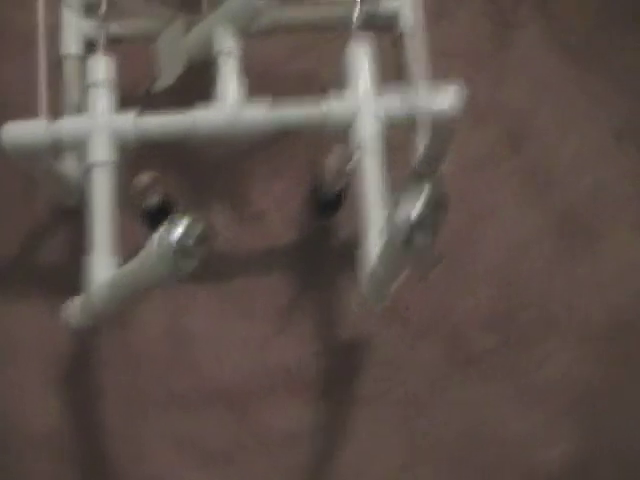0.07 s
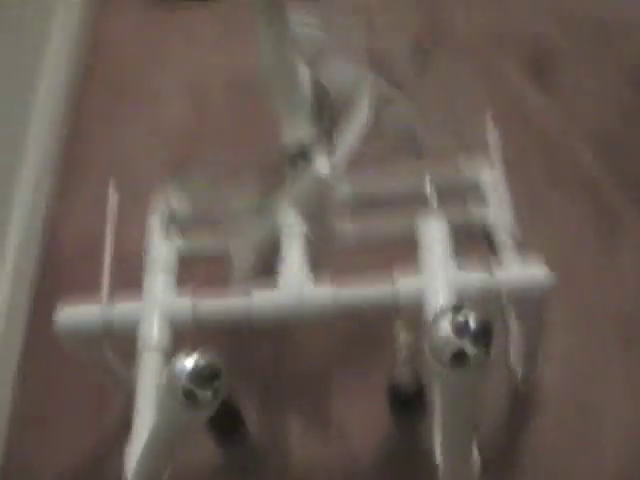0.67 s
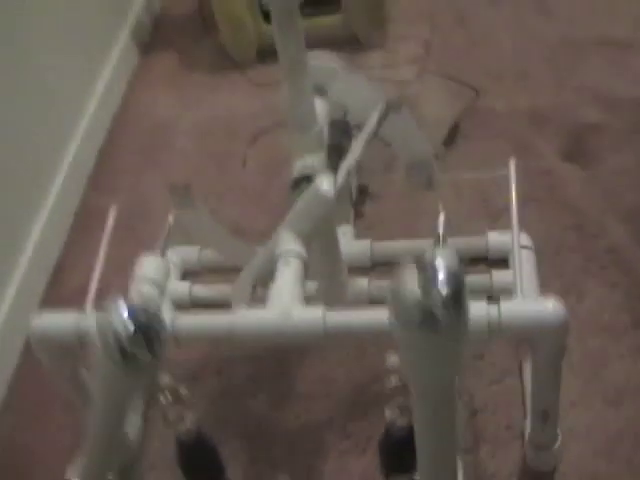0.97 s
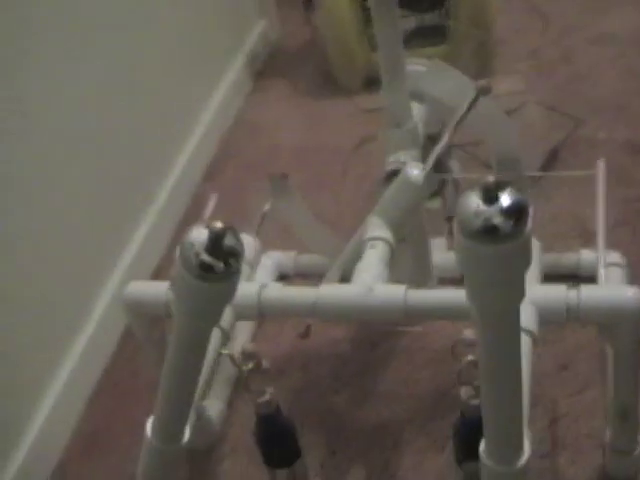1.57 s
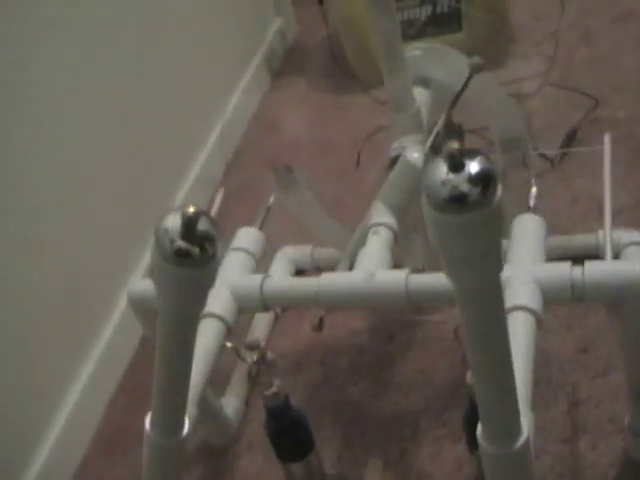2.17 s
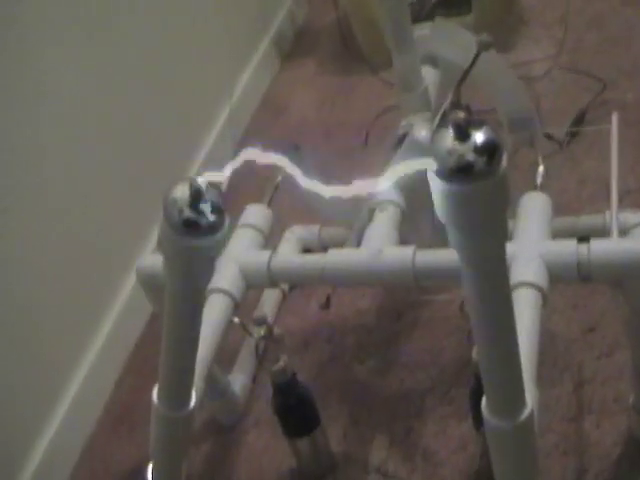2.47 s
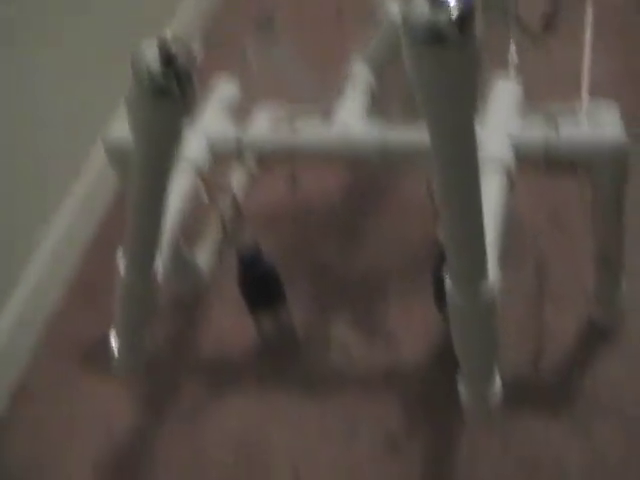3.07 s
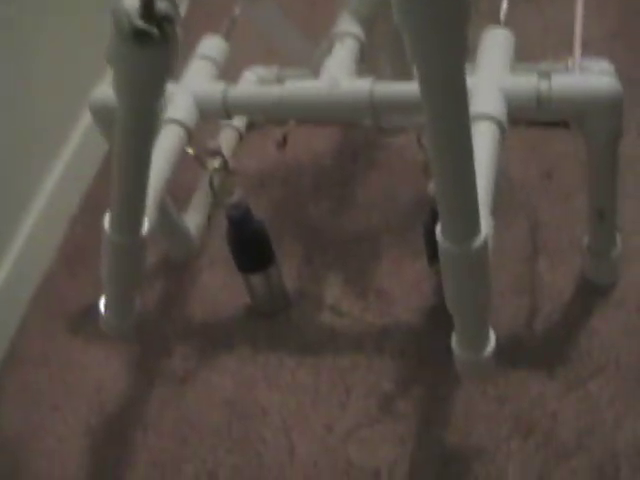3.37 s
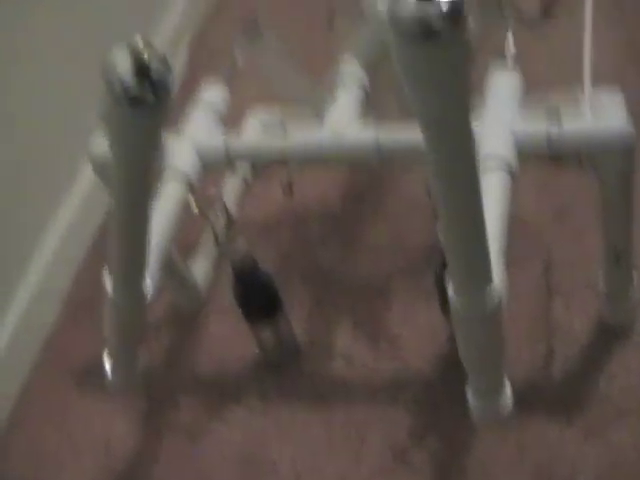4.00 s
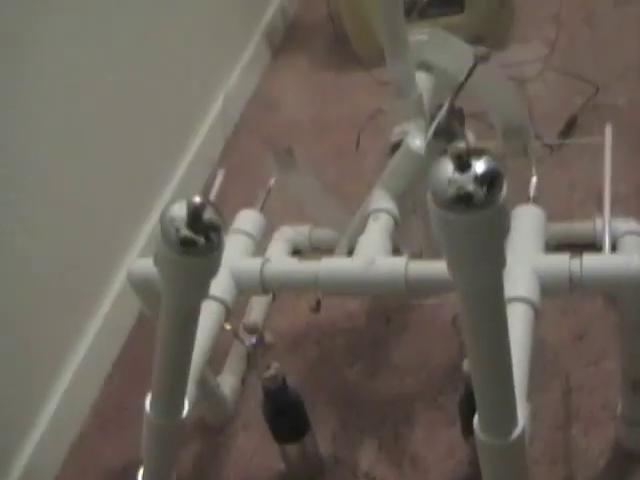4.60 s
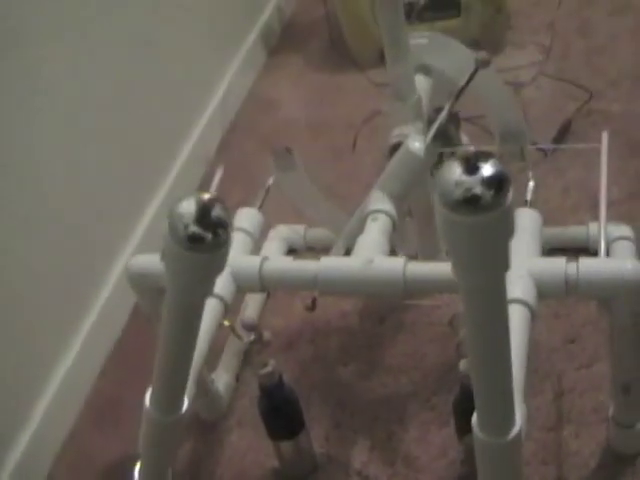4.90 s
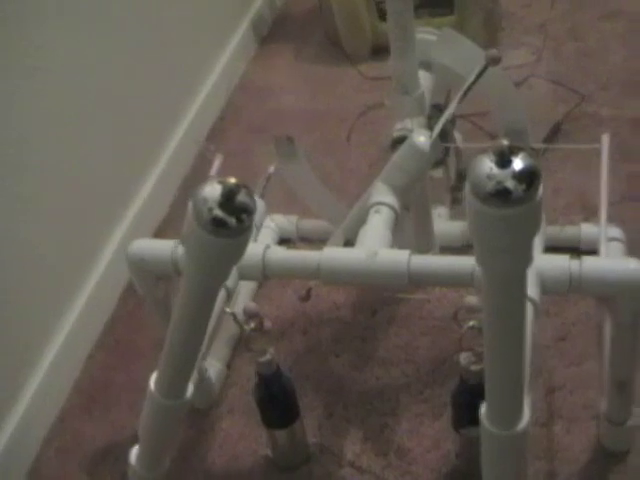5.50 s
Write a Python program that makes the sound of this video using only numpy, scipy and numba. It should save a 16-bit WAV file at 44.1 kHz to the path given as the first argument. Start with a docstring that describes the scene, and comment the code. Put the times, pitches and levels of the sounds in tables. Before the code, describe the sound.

An electrostatic generator runs in a small carpeted room with a faint throbbing hum, a thin motor whine and a light brush squeak. An electric hiss grows and tiny ticks crowd together until a loud, sharp spark snaps between metal terminals. Four sparks come a little over a second apart. After each, the machine sound ducks and swells back. The microphone is close, drifting slightly nearer and then away.

```python
"""An electrostatic generator runs in a small carpeted room; the sound opens ducked by a spark just gone.
The gain recovers: the rotor throbs, its brush squeaks and the motor whines. As charge builds, corona
hisses louder and ticks ever faster, until a spark jumps the gap at about 1.3 s. The snap overloads the
amplifier, the gain control ducks, and the machine swells back. Three more sparks follow, a little over
a second apart, while the microphone drifts closer and, after about 3.3 s, away again."""
import sys
import numpy as np
from scipy import signal
from scipy.fft import rfft, irfft, next_fast_len
from scipy.io import wavfile
from numba import njit

SR = 44100
rng = np.random.default_rng(int(sys.argv[2]) if len(sys.argv) > 2 else 0)


def to_wav(s):
    """Save 16-bit WAV."""
    ch = np.atleast_2d(s).T  # columns
    pcm = np.round(np.clip(ch, -1, 1) * 32767)  # PCM
    wavfile.write(sys.argv[1], SR, pcm.astype(np.int16))


N = 249165
TIME = np.arange(N) / SR

# Breakdowns of the gap: t/s, level/dB, signed kick induced in the left lead, in the right lead
SPARKS = [(-0.062, 5, -6.5, -1), (1.2648, 10.5, -36, -8.5), (2.5443, 12, 28, -39),
          (3.9418, 10.5, -33, 11.5), (5.1486, 8, -5, 1)]
# The clearest small discharges before breakdown: t/s, level/dB
TICKS = [(1.0950, -9), (1.1416, -2.5), (2.4185, -9.5), (3.464, -3), (3.7300, -4), (3.8235, -6),
         (3.861, -4.5), (3.8801, -5), (4.8716, -10.5)]
# Spectrum of a discharge: f/Hz, level/dB
DISCHARGE_SPECTRUM = [(30, 16.5), (150, 4.5), (500, -4.5), (1200, -2.5), (2200, 0), (5000, -1), (8000, 1.5),
                      (11000, 3), (13000, -0.5), (15500, -6)]
# Spectrum of the corona hiss: f/Hz, level/dB
CORONA_SPECTRUM = [(25, -28), (60, -12), (130, -1), (250, -1.5), (400, -2.5), (1000, -2), (2000, -1),
                   (5000, 0.5), (7800, -1), (10100, 2), (11400, 0), (12400, -0.5), (13400, -3), (15500, -8)]
# Harmonics of the rotor hum: multiple of the turning rate, level/dB
ROTOR_HARMONICS = [(3, -67), (6, -53), (8, -57), (9, -68), (10, -55), (11, -42), (12, -41), (13, -89),
                   (14, -51.5), (18, -61), (19, -69), (26, -58.5), (27, -56.5), (28, -57.5), (39, -55.5)]
# Bouts of louder brush squeak: t/s, half length/s, rise/dB
SQUEAK_BOUTS = [(0.25, 0.45, 11), (2.85, 0.2, 2)]
# Harmonics of the motor: multiple of the shaft rate, level/dB
MOTOR_HARMONICS = [(1, -66), (3, -55), (4, -53), (5, -48), (6, -44), (10, -50), (15, -50.5), (20, -62),
                   (25, -55), (30, -52), (31, -61), (35, -73), (36, -69)]
# Standing-wave maxima on the microphone's path: t/s, half length/s, multiple of the shaft rate, rise/dB
ANTINODES = [(0.48, 0.11, 15, 8), (2.92, 0.32, 30, 7.5)]
# Reverberation time of the room: f/Hz, T60/s
REVERB_TIMES = [(100, 0.083), (600, 0.15), (2000, 0.21), (5000, 0.23), (9000, 0.2), (15000, .14)]
# Stereo width at the microphone pair: f/Hz, side level relative to mid/dB
STEREO_WIDTH = [(60, -9), (200, -5.5), (1300, -15.5), (2500, -29), (4400, -7), (8000, -7), (15000, -3.5)]


def sparks(kick_s=.00072, swing_s=.0031, drive=7):
    """Breakdown and induction: each spark snaps, and its current induces a kick in the microphone leads."""
    t = np.arange(2 ** 14) / SR
    backswing = kick_s / swing_s * np.exp(-t / swing_s)
    kick = np.tanh(drive * (np.exp(-t / kick_s) - backswing))
    out = np.zeros((2, N))
    for s, db, left, right in SPARKS:
        # so short a spark radiates hardly any bass: the thump is all electrical
        crack = band(snap(t), 220, 19000)
        add(out, s, undb(db) * crack + np.outer([left, right], kick))
    return out


def snap(t, direct_db=10, direct_s=0.0078, uneven_db=3.5, side_db=-5):
    """Reverberation: a shock wave is followed by dense echoes that decay exponentially in each band."""
    mid, side = rng.standard_normal((2, len(t))) * undb(uneven_db * rng.standard_normal(len(t)))
    echoes = unit(colour(mid + undb(side_db) * side * np.array([[1], [-1]]), DISCHARGE_SPECTRUM))
    spectrum, hz = rfft(echoes), np.fft.rfftfreq(len(t), 1 / SR)
    out = undb(direct_db) * echoes * np.exp(-t / direct_s)
    for centre, t60 in REVERB_TIMES:
        share = lookup([(f, float(f == centre)) for f, _ in REVERB_TIMES], hz)
        out = out + irfft(spectrum * share, len(t)) * np.exp(-np.log(1000) * t / t60)
    return out


def ticks(body=0.77, right_db=-2.0, room_db=-27, room_s=0.0068):
    """Partial discharge: each tiny pulse radiates a bright click, trailed by a short wash of echoes."""
    t = np.arange(2 ** 12) / SR
    pulse = signal.unit_impulse(len(t))
    click = band(pulse, 7300, 11300) + body * band(pulse, 1500, 11700)
    click = click / np.abs(click).max() * undb([[0], [right_db]])
    out = np.zeros((2, N))
    for s, db in TICKS + crackle():
        noise = stereo(*rng.standard_normal((2, len(t))))
        wash = unit(colour(noise, DISCHARGE_SPECTRUM)) * np.exp(-t / room_s)
        add(out, s, undb(db) * (click + undb(room_db) * wash))
    return out


def crackle(rate_per_s=30, reached_s=1.33, e_fold_s=0.09, level_db=-10, spread_db=1.8):
    """A Poisson process: faint ticks crowd together as breakdown nears. Rows of t/s, level/dB."""
    per_s = rate_per_s * np.exp((charging_time() - reached_s) / e_fold_s)
    times = TIME[rng.random(N) < per_s / SR]
    return [(s, level_db + spread_db * rng.standard_normal()) for s in times]


def corona(level_db=-26.25, growth_db_per_s=1.7, reached_s=2.0, flicker_db=0.95):
    """Corona discharge: charge leaks off the metal as a hiss that grows until the next spark."""
    noise = stereo(*rng.standard_normal((2, N)))
    hiss = unit(reflections(colour(noise, CORONA_SPECTRUM)))
    return hiss * undb(level_db + growth_db_per_s * (charging_time() - reached_s) + flicker_db * walk(40))


def rotor(gain_db, turns, load_db_per_s=1.2, flutter_db=1.1):
    """Beating: adjacent harmonics throb once a turn; the hum grows as charge loads the rotor."""
    level_db = gain_db + load_db_per_s * charging_time() + flutter_db * walk(14)
    return undb(level_db) * harmonics(turns, ROTOR_HARMONICS)


def motor(low_db, high_db, shaft_hz=122.45, flutter_db=2.0):
    """Shaft harmonics: a small motor drones on its low orders and whines chiefly on every fifth."""
    turns = rotation(shaft_hz, wander=0.00204, wander_per_s=7)
    out = np.zeros(N)
    for order, db in MOTOR_HARMONICS:
        gain_db = low_db if order < 10 else high_db
        level_db = gain_db + standing_wave_db(order) + flutter_db * walk(7)
        out += undb(level_db) * harmonics(turns, [(order, db)])
    return out


def brush(gain_db, turns, level_db=-46, fade_db_per_s=2, lag_turns=0.11):
    """Sliding friction: the brush squeaks just after each throb, and fades while the charge builds."""
    contact = (.5 + .5 * np.cos(2 * np.pi * (turns - lag_turns))) ** 3
    squeak = unit(contact * band(rng.standard_normal(N), 3530, 3830))
    bouts_db = sum(db * bell(s, half_s) for s, half_s, db in SQUEAK_BOUTS)
    return undb(gain_db + level_db + bouts_db - fade_db_per_s * charging_time()) * squeak


def reflections(x, share=0.1, first_s=0.000811, last_s=.008, drift_s=.00004, count=5):
    """Interference: echoes off frame, floor and wall ripple the spectrum, shifting as the microphone moves."""
    out = x
    for lag_s in np.geomspace(first_s, last_s, count) * rng.uniform(.9, 1.099, count):
        emitted_s = TIME - lag_s - drift_s * walk(1.0)
        out = out + share * np.array([np.interp(emitted_s, TIME, channel) for channel in x])
    return out


def standing_wave_db(order):
    """Standing waves: a motor harmonic swells as the microphone passes through its antinode."""
    return sum(db * bell(s, half_s) for s, half_s, k, db in ANTINODES if k == order)


def spreading_db(closest_m=0.64, closest_at_s=3.28, speed_m_per_s=0.26):
    """Spherical spreading: direct pressure falls as 1/distance, from 0 dB at the closest approach."""
    distance_m = np.hypot(closest_m, speed_m_per_s * (TIME - closest_at_s))
    return 20 * np.log10(closest_m / distance_m)


def charging_time():
    """Charge accumulation: seconds since the last spark."""
    times = np.array(SPARKS)[:, 0]
    return TIME - times[np.searchsorted(times, TIME) - 1]


def rotation(hz, wander, wander_per_s):
    """Phase as the integral of frequency: turns made by a slightly unsteady shaft."""
    return np.cumsum(hz * (1 + wander * walk(wander_per_s))) / SR


def harmonics(turns, orders):
    """A Fourier series locked to a turning shaft."""
    return sum(np.sqrt(2) * undb(db) * np.cos(2 * np.pi * k * turns) for k, db in orders)


def stereo(mid, side):
    """Sum and difference: left and right share the mid signal and differ by the filtered side signal."""
    return mid + colour(side, STEREO_WIDTH) * np.array([[1], [-1]])


def colour(x, points):
    """Spectral shaping by a curve of f/Hz, level/dB."""
    size = next_fast_len(x.shape[-1])
    gain = undb(lookup(points, np.fft.rfftfreq(size, 1 / SR)))
    return irfft(rfft(x, size) * gain, size)[..., :x.shape[-1]]


def lookup(points, hz):
    """Interpolation of f/Hz, value points on a log-frequency axis."""
    f, value = np.transpose(points)
    return np.interp(np.log(hz + 1), np.log(f), value)


def band(x, lo_hz, hi_hz):
    """Band-pass filtering."""
    return signal.sosfilt(signal.butter(2, [lo_hz, hi_hz], "band", fs=SR, output="sos"), x)


def walk(per_s):
    """Random modulation with a spread near 1, interpolated between per_s new values a second."""
    knots = rng.standard_normal(int(6 * per_s) + 2)
    return np.interp(TIME * per_s, np.arange(len(knots)), knots)


def bell(s, half_s):
    """A Gaussian swell of height 1 around time s."""
    return np.exp(-((TIME - s) / half_s) ** 2)


def undb(db):
    """Amplitude ratio of a level in decibels."""
    return np.exp(np.asarray(db) * (np.log(10) / 20))


def unit(x):
    """Normalisation to rms 1."""
    return x / np.sqrt(np.mean(x ** 2))


def add(out, s, sound):
    """Superposition of a sound starting at time s."""
    start = int(round(s * SR))
    a, b = max(start, 0), min(start + sound.shape[-1], N)
    out[:, a:b] += sound[..., a - start:b - start]


def scene(rotor_hz=20.2, rotor_db=-0.6, drone_db=-0.1, whine_db=-0.3, corona_direct=0.58):
    """Superposition: the discharges and the running machine add at the moving microphone."""
    near_db = spreading_db()
    dip_db = -2 * bell(s=0.55, half_s=0.33)  # the microphone swings up over the machine
    turns = rotation(rotor_hz, wander=0.0021, wander_per_s=4.015) - .35
    squeak = brush(near_db, turns)
    hum = rotor(rotor_db + near_db + dip_db, turns)
    whine = motor(drone_db + near_db + dip_db, whine_db)
    hiss = undb(corona_direct * near_db) * corona()  # the room evens out part of the change with distance
    return sparks() + ticks() + hiss + hum + whine + squeak


@njit
def detector(excess, charge, attack_s, release_s):
    """Envelope detection: a capacitor charges quickly on loud sound and drains slowly."""
    out = np.empty(len(excess))
    for i in range(len(excess)):
        charge += max(excess[i] - charge, 0.) / (attack_s * SR) - charge / (release_s * SR)
        out[i] = charge
    return out


def gain_control(x, threshold=0.37, strength=3.5, limit=17.15, first_charge=9.2):
    """Compression: peaks over the threshold lower the gain, which starts ducked by the spark just gone."""
    excess = np.clip(strength * (np.abs(x).max(axis=0) - threshold), 0, limit)
    return x / (1 + detector(excess, first_charge, attack_s=0.0037, release_s=0.23))


def comb_filter(x, drum_hz=149.72, depth=0.86, feedback=.5):
    """Destructive interference: inverted repeats notch out the harmonics of a recorder's head drum."""
    size = next_fast_len(N + SR)
    delay = np.exp(-2j * np.pi * np.fft.rfftfreq(size, 1 / SR) / drum_hz)
    return irfft(rfft(x, size) * (1 - depth * delay) / (1 - feedback * delay), size)[:, :N]


def record(dry, ceiling=0.85, low_cut_hz=50, top_hz=15800):
    """Saturation and band limiting: snaps outrun the gain control, overload the amplifier and are filtered."""
    ducked = gain_control(dry)
    overloaded = ducked / (1 + (ducked / ceiling) ** 4) ** .25
    low_cut = signal.butter(2, low_cut_hz, "high", fs=SR, output="sos")
    top_cut = signal.ellip(8, .2, 60, top_hz, fs=SR, output="sos")
    filtered = signal.sosfilt(low_cut, comb_filter(overloaded))
    return signal.sosfilt(top_cut, np.clip(filtered, -1, 1))


dry = scene()
out = record(dry)
to_wav(out)
```